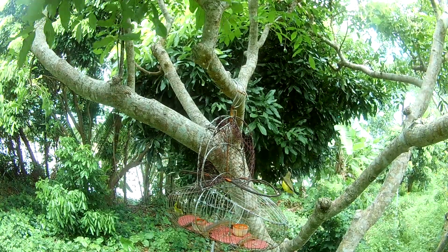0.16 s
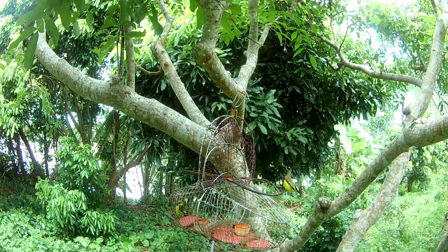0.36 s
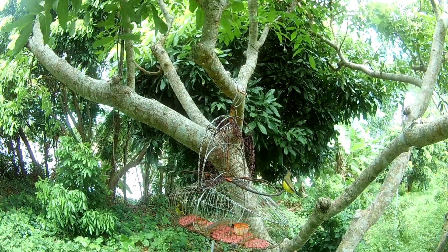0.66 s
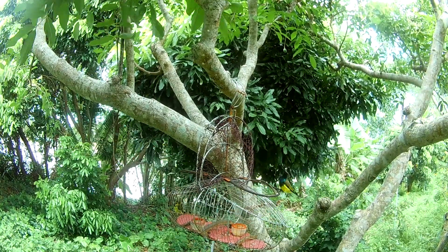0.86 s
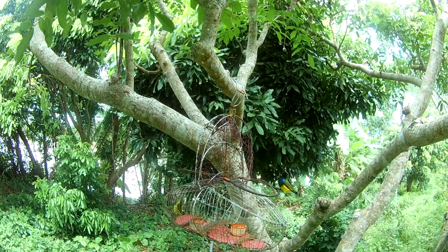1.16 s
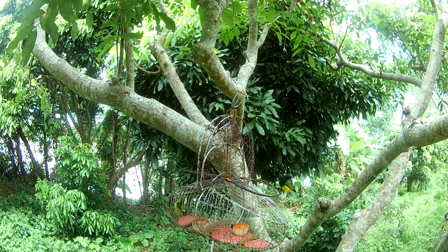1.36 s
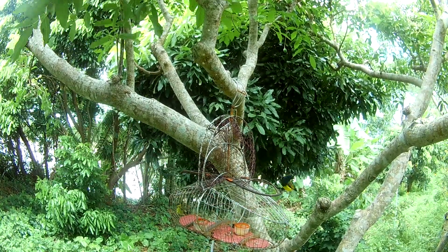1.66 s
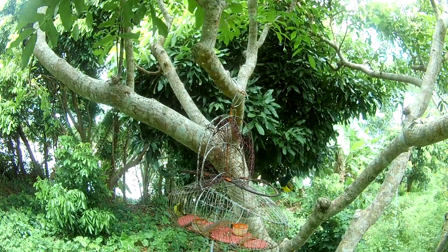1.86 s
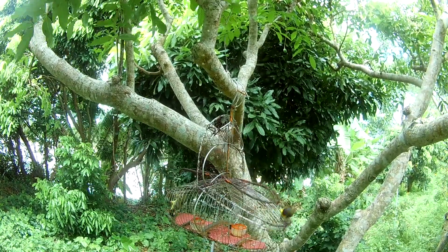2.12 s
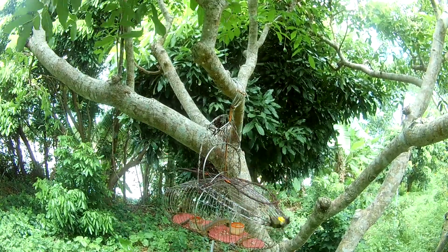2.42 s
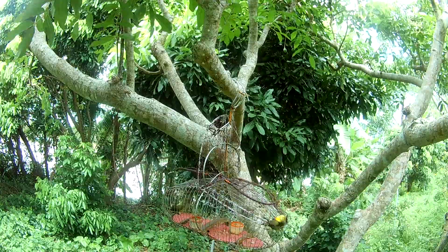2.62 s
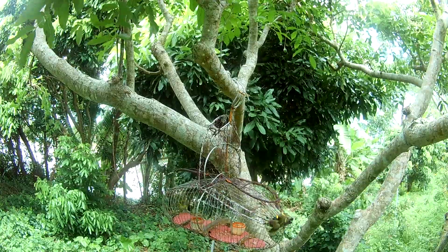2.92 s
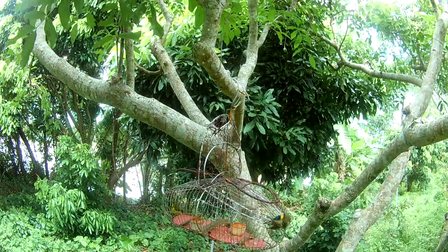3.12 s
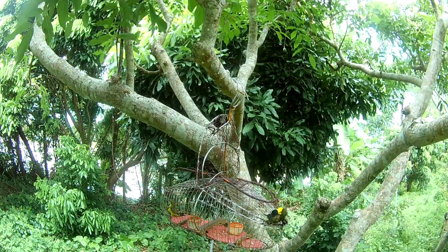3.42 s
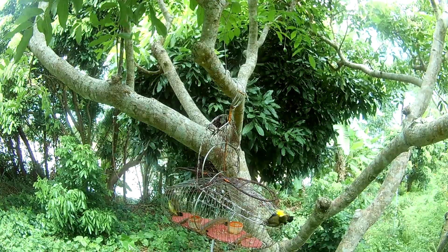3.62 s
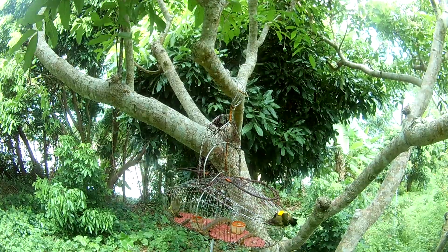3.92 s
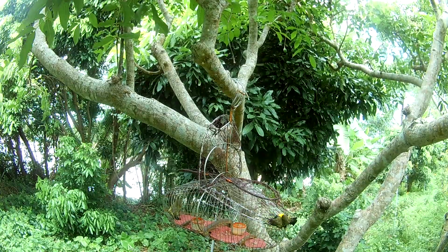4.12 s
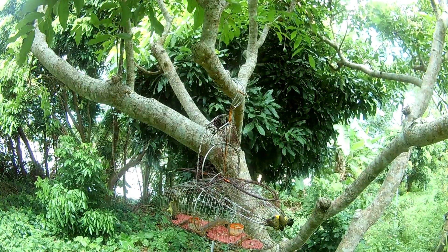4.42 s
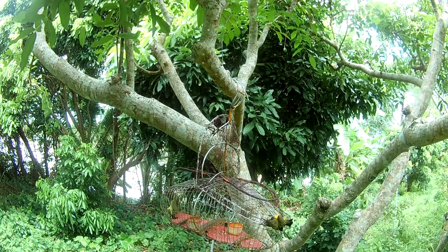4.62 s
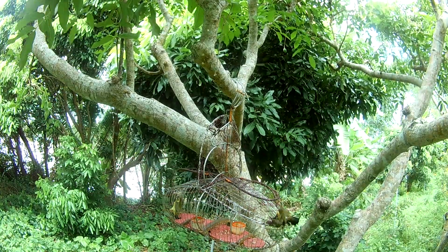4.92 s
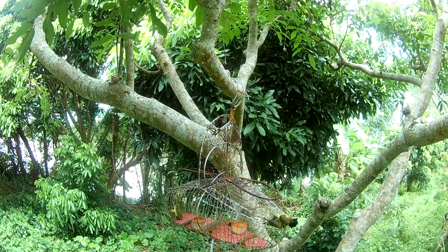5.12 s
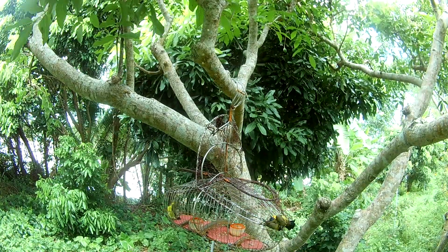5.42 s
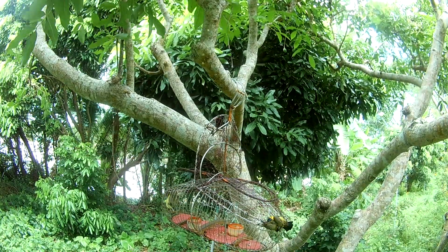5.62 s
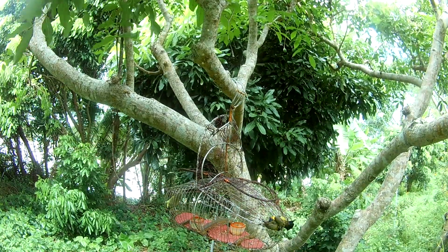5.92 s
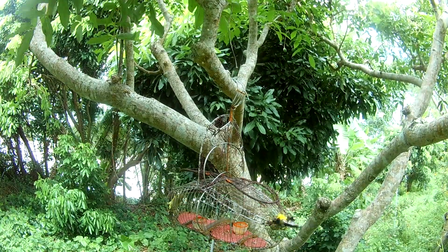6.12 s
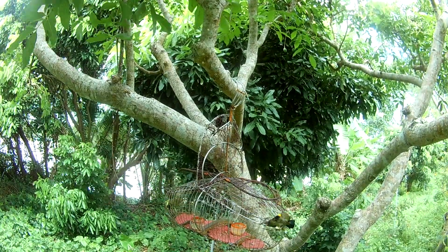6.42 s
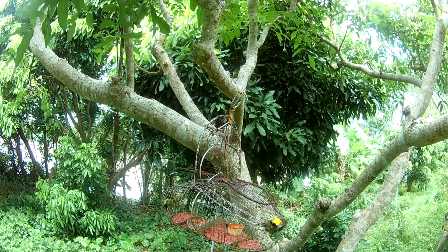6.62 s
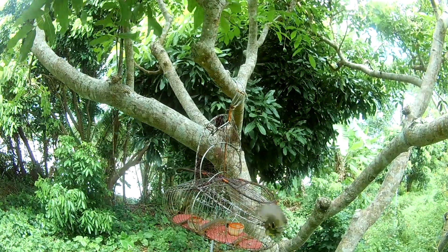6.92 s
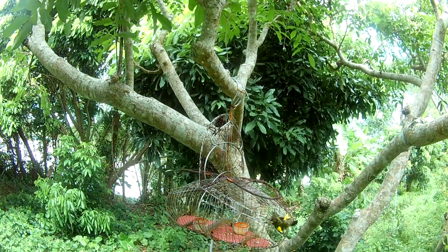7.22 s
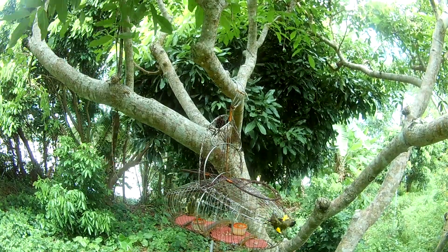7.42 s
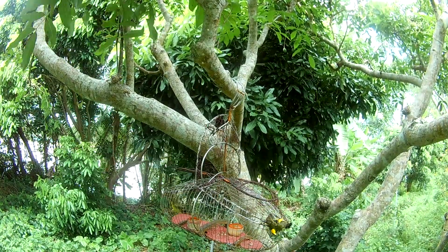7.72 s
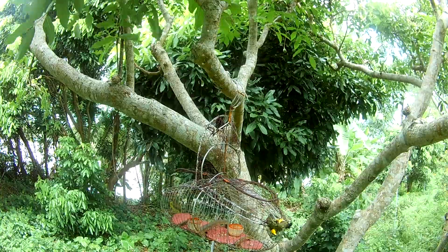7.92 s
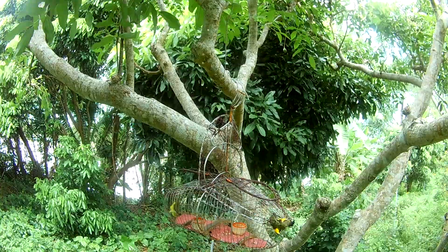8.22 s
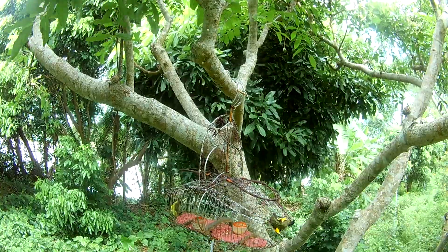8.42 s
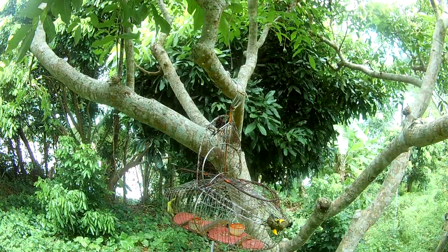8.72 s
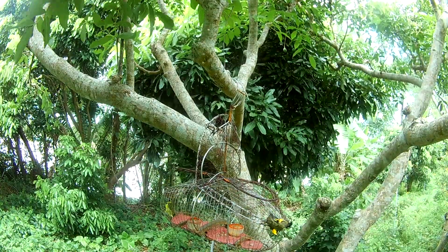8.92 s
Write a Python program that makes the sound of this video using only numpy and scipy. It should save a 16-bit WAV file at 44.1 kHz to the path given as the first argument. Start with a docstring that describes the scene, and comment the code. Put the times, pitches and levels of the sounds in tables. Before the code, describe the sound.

Outdoors among trees, small birds open with faint buzzy slurs, then a run of harsh chatter with a few dry twig ticks and a thin nasal squeal. Three clear rising whistles follow about 0.7 seconds apart, then a buzzy slur and more quick chatter, a tiny high tick, and three more whistles. Distant birds twitter throughout while wind thumps low and irregularly on the microphone.

```python
"""Small birds open with buzzy slurs and a run of harsh two-voiced chatter; dry twig ticks, a pip and a nasal
squeal follow. Sunbirds then give rising whistles, each led in by a tiny two-voiced flick; chatter returns,
a thin V-shaped tick passes, and the whistles come back. Calls are trembling sine voices that bend in pitch,
scattered by trunk echoes and foliage. Throughout, a blurred chorus of chirps twitters far off and shaped
noise makes wind buffeting on the microphone and a soft bed of distant air."""
import sys
import numpy as np
from scipy import signal
from scipy.io import wavfile
from scipy.ndimage import uniform_filter1d, map_coordinates

SR = 44100
rng = np.random.default_rng(int(sys.argv[2]) if len(sys.argv) > 2 else 0)


def transcribe(signal):
    """Save signal, clipped to [-1, 1], as a 16-bit WAV file at the path in sys.argv[1]."""
    frames = np.atleast_2d(signal).T
    limited = np.clip(frames, -1, 1)
    pcm = np.round(limited * 32767).astype(np.int16)
    wavfile.write(sys.argv[1], SR, pcm)


N = 399546
TIME = np.arange(N) / SR  # seconds

# All bird levels are set ahead of the mix; a shape's level_db adds to that of the note.
# rising whistles: start_s, knee_s (where the glide steepens), end_s, level_db
WHISTLES = [(3.637, 3.751, 3.822, -34), (4.252, 4.385, 4.452, -36), (5.003, 5.113, 5.203, -34.5),
            (7.262, 7.367, 7.447, -32.5), (7.982, 8.103, 8.188, -35), (8.662, 8.777, 8.860, -32.5)]
# course of a whistle: stage (0 start, 1 knee, 2 end), pitch_hz, level_db
WHISTLE_SHAPE = [(0, 2974, -35.5), (.15, 3480, -25.5), (.3, 3918, -7.5), (.54, 4288, 0), (.76, 4480, -3.5),
                 (1, 4810, -7), (1.35, 5370, -12.5), (1.7, 5950, -20.5), (2, 6550, -32)]
# overtones of a whistle: multiple, level_db
WHISTLE_PARTIALS = [(1, -2), (2, -54), (3, -53.5)]
# flicks that lead into the whistles: start_s, length_s, level_db
FLICKS = [(3.598, 0.033, -50), (4.212, 0.052, -51.5), (4.968, 0.031, -51.5), (7.228, 0.032, -47),
          (7.944, .034, -46), (8.622, 0.044, -46.5)]
# the two sides of the syrinx in a flick: share_of_note, pitch_hz, level_db
FLICK_LOW = [(0, 4360, 0.5), (.3, 3830, -19.5), (.6, 3730, -9), (.85, 4200, 4), (1, 4450, -4)]
FLICK_HIGH = [(0, 4010, -5.5), (0.248, 5150, -7.5), (.6, 5750, -20), (1, 5330, -21.5)]
# chatter notes: start_s, length_s, level_db, high_side_db (added on the high side)
CHATTER = [(0.56, .054, -55, -5), (0.736, .054, -44.5, -1.5), (1.677, .061, -46, 0),
           (1.883, 0.068, -48, -2), (1.979, 0.058, -45.5, -2), (2.085, 0.061, -47, 0),
           (2.179, .07, -47, -3), (2.284, 0.074, -52.5, 0), (2.392, 0.07, -52.5, 2),
           (2.491, 0.069, -48, -2), (2.606, 0.067, -51, 1.5), (2.762, 0.084, -52, 2.5),
           (2.889, 0.062, -46, -4), (3.068, 0.07, -46, -3.5), (4.865, 0.062, -65, 4),
           (5.525, 0.075, -56.5, 3.5), (5.651, .057, -54, 0), (5.786, .07, -55.5, 4),
           (5.899, .064, -55, 2.5), (6.000, 0.064, -54.5, 3.5), (6.105, 0.069, -47.5, -0.5),
           (6.214, 0.065, -48, -0.5), (6.322, 0.068, -47.5, -0.5), (6.43, 0.068, -46.5, 1),
           (6.541, 0.067, -46.5, -1.5), (6.66, 0.085, -47, -2)]
# the two sides of the syrinx in a chatter note: share_of_note, pitch_hz, level_db
CHATTER_LOW = [(0, 4100, -5.5), (.1, 4400, -5), (.22, 4280, -5.5), (.5, 4400, 4), (.64, 4800, -10.5),
               (.75, 4850, -29), (1, 4730, -28)]
CHATTER_HIGH = [(0, 4880, -13), (0.199, 5150, -6), (0.599, 5070, -8.5), (.73, 5300, -3.5),
                (0.861, 6150, -18), (1, 6240, -18)]
# buzzy slurs: start_s, length_s, first_hz, last_hz, bend (over 1 glides early and levels off),
# level_db, fade_db (lost over the note)
SLURS = [(.02, 0.062, 5460, 6030, 1.3, -62.5, 13), (.18, .11, 4400, 4260, 0.89, -55, 10),
         (.848, .22, 4304, 4660, 2.4, -48, 25), (1.45, .155, 4200, 5520, .6, -54.5, 0.5),
         (5.305, 0.2, 3710, 5200, 5.5, -43.5, 6), (7.582, .225, 4260, 5295, 2.3, -40, 16)]
# clear pips: start_s, length_s, first_hz, last_hz, bend, level_db, fade_db
PIPS = [(2.55, 0.033, 4300, 4090, 1.1, -48, 8), (5.502, 0.027, 3934, 4500, .45, -47.5, 4),
        (5.705, 0.088, 3900, 3900, 1.1, -56, 5), (7.732, 0.036, 4200, 4190, 1.1, -53, -5),
        (7.782, 0.05, 4280, 4200, 1.1, -50, 8), (8.905, 0.041, 4920, 4900, 1.1, -61, 2)]
# course of the nasal squeal: time_s, pitch_hz, level_db, shrillness_db_per_octave
SQUEAL = [(2.89, 2030, -62, -4), (2.91, 2383, -62, 0), (2.934, 2150, -66, 3), (2.956, 2366, -61, -8),
          (3.027, 2524, -68.5, 4.5), (3.061, 2370, -61.5, 1), (3.083, 2120, -65, 2), (3.102, 2420, -65, 0),
          (3.112, 2070, -59, 1)]
# overtones of the squeal: multiple, level_db
SQUEAL_PARTIALS = [(1, -1.5), (1.5, -10.5), (2, 3.5), (2.5, -9), (3, -1.5), (3.5, -22), (4, -22)]
# dry twig ticks as a bird lands: start_s, level_db (of the noise at onset, ahead of its filters)
TWIG_TICKS = [(2.138, -36.5), (2.149, -41), (2.161, -41), (2.186, -53)]
# raspy phrases of birds farther off: start_s, length_s, level_db (strength added to the steady twitter)
FAR_PHRASES = [(0.176, .13, -63), (0.334, 0.21, -63.5), (0.566, 0.44, -63.5), (1.099, 0.356, -66),
               (1.471, 0.28, -66.5), (3.37, 0.19, -66.5), (3.965, 0.35, -73), (4.696, 0.037, -69.5),
               (5.263, 0.27, -66), (6.876, 0.16, -64), (7.49, 0.35, -64.5), (8.40, 0.12, -73.5)]
# breeze on the microphone, before its swings: time_s, large_eddies_db, small_eddies_db
BREEZE = [(0.0, -42.5, -40), (0.11, -42.5, -57.5), (0.5, -42, -55.5), (0.7, -36.5, -51), (0.8, -39, -49),
          (1.0, -38, -38), (1.36, -32, -36.5), (1.58, -44.5, -53), (1.72, -37.0, -42), (2.06, -38.5, -46),
          (2.19, -33, -36.5), (2.5, -34.5, -47), (2.92, -45, -56), (3.06, -33, -44.0), (3.5, -41, -44),
          (4.0, -43.5, -53.0), (4.52, -47.5, -68.5), (4.7, -29, -37), (4.97, -43, -49.5), (5.4, -38.5, -45),
          (5.65, -37.5, -48.5), (5.92, -36, -44), (6.58, -35.5, -46), (6.76, -45, -51.5),
          (6.88, -36, -40.5), (7.1, -31.5, -43), (7.8, -31.5, -39.5), (8.05, -32, -41.5), (8.8, -36, -45.5),
          (8.93, -38, -40.5), (9.06, -32.5, -29.5)]
# moments when the breeze drops between gusts: time_s
LULLS = [0.569, .74, 1.185, 2.089, 2.61, 3.55, 4.44, 5.135, 6.0, 6.34, 6.78, 7.224, 7.355, 7.926, 8.56]
# sudden buffets of wind: start_s, low_thump_db, flutter_db (above the thump in pitch)
BUFFETS = [(.155, -39, -55), (.33, -37, -59), (0.604, -34, -55), (0.684, -32.5, -39), (1.211, -29, -36),
           (1.35, -31.5, -39), (2.136, -39, -44), (2.65, -44, -41), (2.764, -40, -48),
           (3.439, -31.5, -45.5), (3.571, -30, -45), (4.36, -39.5, -46), (4.68, -44, -46),
           (5.055, -32.5, -46), (5.29, -36.5, -36.5), (5.426, -32.5, -38), (5.888, -28.5, -42.5),
           (5.953, -47, -36), (6.21, -26.5, -37.5), (6.421, -28, -36.5), (6.559, -31, -38.5),
           (7.05, -30, -33.5), (7.12, -31.5, -42.5), (7.25, -38.5, -40.5), (7.30, -32, -51),
           (7.48, -30, -36.5), (7.703, -45, -29.5), (7.814, -29, -29), (7.959, -30, -49),
           (8.243, -24.5, -33), (8.38, -31.5, -42), (8.664, -32, -33), (8.91, -27.5, -27)]
# relative noise spectra: frequency_hz, density_db_per_hz
LARGE_EDDIES = [(22, -11.5), (45, 0), (95, 2), (150, -4), (200, -16), (300, -30)]
SMALL_EDDIES = [(110, -18.5), (160, -2.5), (210, 4.5), (300, -9), (450, -13), (700, -32), (1100, -48),
                (2000, -82.5)]
AIR = [(22, 3), (60, 3.5), (250, -4), (500, -1), (1000, -3), (1500, -14.5), (2100, -21), (3000, -22.5),
       (6000, -34), (8000, -33.5), (12000, -36), (15500, -32.5)]
# strong reflections from the nearest trunks and the ground: delay_s, level_db
TRUNKS = [(.0043, -9), (0.0096, -6.5), (.021, -23), (.038, -20)]

TICK_START_S, TICK_S, TICK_BOTTOM_HZ, TICK_SWOOP_HZ = 7.054, 0.031, 6430, 1450
TICK_DB, TICK_EDGE_DB = -53.5, -12  # level at the bottom of the swoop; change towards either end
FAR_ATTACK_S, FAR_RELEASE_S, FAR_STEADY_DB = 0.02, 0.039, -69
LULL_S, LULL_DB = 0.02, -14
BUFFET_ATTACK_S, BUFFET_HOLD_S, BUFFET_RELEASE_S = 0.0055, 0.024, 0.048
EDDY_TOP_HZ, AIR_DB, CUTOFF_HZ = 1010, -58, 15750


def rising_whistles():
    """Each whistle climbs to its loudest, eases, then steepens upward as it fades."""
    out = np.zeros(N)
    for start, knee, end, level_db in WHISTLES:
        stage = np.interp(span(start, end), [start, knee, end], [0, 1, 2])
        hz, shape_db = read(WHISTLE_SHAPE, stage)
        add(out, start, syrinx(hz, shape_db + level_db, jitter=0.0063, partials=WHISTLE_PARTIALS))
    return out


def flicks():
    """Both sides of the syrinx sound at once: the low one dips and recovers as the high one leaps."""
    low = repeats(FLICKS, FLICK_LOW, variety=0.018, jitter=0.018)
    high = repeats(FLICKS, FLICK_HIGH, variety=0.03, jitter=0.038)
    return low + high


def chatter():
    """The low side pulses in quick upward strokes while the high side rasps above it."""
    low_notes = [(start, length, level_db) for start, length, level_db, _ in CHATTER]
    high_notes = [(start, length, level_db + high_db) for start, length, level_db, high_db in CHATTER]
    low = repeats(low_notes, CHATTER_LOW, variety=0.02, jitter=0.017,
                  warble=0.075, warble_hz=145, throb_db=6)
    high = repeats(high_notes, CHATTER_HIGH, variety=0.025, jitter=0.034,
                   warble=0.045, warble_hz=145, throb_db=4)
    voice = from_db(-1.5) * (low + high)
    return voice * (1 + 0.096 * drift(3500, N))  # unsteady airflow spreads a faint rasp around the notes


def slurs():
    """A fast warble of pitch puts the buzz into each bending note."""
    return glides(SLURS, attack_s=0.021, release_s=0.016, jitter=0.021, warble=0.021, warble_hz=168)


def pips():
    """Short clear notes: the same bending voice with no warble."""
    return glides(PIPS, attack_s=0.006, release_s=0.005, jitter=0.015)


def squeal():
    """A thin, wavering nasal cry whose overtones flare as the bird strains."""
    start = SQUEAL[0][0]
    hz, db, shrill_db = read(SQUEAL, span(start, SQUEAL[-1][0]))
    out = np.zeros(N)
    add(out, start, syrinx(hz, db, jitter=0.0048, partials=SQUEAL_PARTIALS, shrill_db=shrill_db))
    return out


def tick():
    """A thin, very high call swoops down and back up, loudest at the bottom."""
    out = np.zeros(N)
    height = np.linspace(-1, 1, len(span(0, TICK_S))) ** 2
    hz = TICK_BOTTOM_HZ + TICK_SWOOP_HZ * height
    add(out, TICK_START_S, syrinx(hz, TICK_DB + TICK_EDGE_DB * height, jitter=0.0097))
    return out


def twig():
    """Fast-decaying noise makes a dry crack: a woody middle band and a faint bright one."""
    out, t = np.zeros(N), span(0, 0.04)
    for start, level_db in TWIG_TICKS:
        crack = rng.standard_normal(len(t)) * from_db(level_db - 60 * t / 0.031)
        wood = band(crack, 1200, 2340)
        snap = from_db(-26) * band(crack, 2500, 11000)
        add(out, start, wood + snap)
    return out


def chorus(count, centre_hz, spread, dull_db):
    """Distant raspy chirps overlap and blur among the trees; the higher ones are fainter."""
    out, share = np.zeros(N), np.linspace(0, 1, int(0.04 * SR))
    for k, (when, pitch, slope) in enumerate(rng.random((count, 3))):
        hz = centre_hz * np.exp(spread * pitch + 0.2 * (slope - 0.5) * (share - 0.5))
        chirp = np.sin(np.pi * share) * syrinx(hz, dull_db * pitch, jitter=0.035)
        add(out, (k + when) / count * N / SR, chirp)
    blur = foliage(out, t60=0.36, onset_s=0.0046, low_hz=3530, high_hz=6700)
    loudness = np.sqrt(uniform_filter1d(blur ** 2, SR // 10) + 1e-9)
    return far_phrases() * blur / loudness  # levelled first, so the phrases set the strength


def far_phrases():
    """Strength of the distant birds: phrases stand out of a faint steady twitter."""
    strength = np.full(N, from_db(FAR_STEADY_DB))
    for start, length, level_db in FAR_PHRASES:
        add(strength, start, from_db(level_db) * swell(length, FAR_ATTACK_S, FAR_RELEASE_S))
    return strength


def wind(unsteady_db, unsteady_per_s):
    """An unsteady breeze with brief lulls rumbles on the microphone; buffets come on top."""
    lulls = sum(np.exp(-((TIME - when) / LULL_S) ** 2) for when in LULLS)
    swing_db = LULL_DB * lulls + unsteady_db * drift(unsteady_per_s, N)
    breeze = from_db(np.array(read(BREEZE, TIME)) + swing_db)
    large, small = np.hypot(breeze, buffets())  # powers add
    rumble = eddies(LARGE_EDDIES, large, lumps_db=6.5, lumps_per_s=30)
    flutter = eddies(SMALL_EDDIES, small, lumps_db=6.5, lumps_per_s=50)
    return rumble + flutter


def buffets():
    """Strength of the large and small eddies that hit the microphone abruptly and soon die away."""
    large, small = np.zeros((2, N))
    shape = swell(BUFFET_ATTACK_S + BUFFET_HOLD_S, BUFFET_ATTACK_S, BUFFET_RELEASE_S)
    for start, thump_db, flutter_db in BUFFETS:
        add(large, start, from_db(thump_db) * shape)
        add(small, start, from_db(flutter_db) * shape)
    return large, small


def eddies(spectrum, strength, lumps_db, lumps_per_s):
    """Turbulence is noise in short lumps, evened out over longer spans so the wind sets its strength."""
    flow = noise(spectrum) * from_db(lumps_db * drift(lumps_per_s, N))
    power = uniform_filter1d(uniform_filter1d(flow ** 2, size=1700), size=900)
    return band(strength * flow / np.sqrt(power + 1e-9), 20, min(spectrum[-1][0], EDDY_TOP_HZ))


def air():
    """Steady noise, heaviest in the lows, makes the soft distant hum of air."""
    return from_db(AIR_DB) * noise(AIR)


def trunks(x):
    """A few distinct echoes beat against a gliding note and make it flutter."""
    out = x.copy()
    for delay, level_db in TRUNKS:
        add(out, delay, from_db(level_db) * x)
    return out


def foliage(x, t60, onset_s, low_hz, high_hz):
    """Many small echoes from leaves and trunks build up and die away; the tail has unit energy."""
    t = span(0, t60)
    echoes = rng.standard_normal(len(t)) * (rng.random(len(t)) < 3000 / SR)  # about 3000 a second
    decay = from_db(-60 * t / t60) * (1 - np.exp(-t / onset_s))
    tail = band(echoes * decay, low_hz, high_hz)
    return signal.fftconvolve(x, tail / np.linalg.norm(tail))[:N]


def syrinx(hz, db, jitter, warble=0, warble_hz=0, throb_db=0, partials=((1, 0),), shrill_db=0):
    """One vibrating membrane: its pitch trembles at random; a fast warble swings pitch and strength."""
    n = len(hz)
    cycle = 2 * np.pi * (np.cumsum(warble_hz * (1 + 0.1464 * drift(80, n))) / SR + rng.random())
    wavering_hz = hz * (1 + jitter * drift(900, n) + warble * np.sin(cycle))
    phase = 2 * np.pi * np.cumsum(wavering_hz) / SR
    edge = np.clip(np.minimum(np.arange(n), np.arange(n)[::-1]) / (0.0025 * SR), 0, 1)
    tone = 0
    for multiple, level_db in partials:
        tilt_db = np.log2(multiple) * (shrill_db + 1.4 * drift(51.7, n))
        tone = tone + from_db(level_db + tilt_db) * np.sin(round(2 * multiple) / 2 * phase)
    strength = from_db(db + throb_db * np.cos(cycle) + 2.02 * drift(105, n))  # loudest on each upswing
    return np.sqrt(2) * strength * np.sin(edge * np.pi / 2) ** 2 * tone


def repeats(notes, shape, variety, **voice):
    """One side of the syrinx repeats its course, a little different in every note."""
    out = np.zeros(N)
    for start, length, level_db in notes:
        share = (span(start, start + length) - start) / length
        hz, shape_db = read(shape, share)
        varied_hz = hz * (1 + variety * drift(37.9, len(hz)))
        add(out, start, syrinx(varied_hz, shape_db + level_db, **voice))
    return out


def glides(notes, attack_s, release_s, **voice):
    """Single notes bend from one pitch to another while their level slides by fade_db."""
    out = np.zeros(N)
    for start, length, first_hz, last_hz, bend, level_db, fade_db in notes:
        t = span(0, length)
        share = np.clip(t / length, 0, 1)
        hz = last_hz + (first_hz - last_hz) * (1 - share) ** bend
        edges = np.clip(np.minimum(t / attack_s, (length - t) / release_s), 0, 1)
        add(out, start, edges * syrinx(hz, level_db - fade_db * share, **voice))
    return out


def swell(length, attack_s, release_s):
    """Rise, hold until the length is up, then die away."""
    t = span(0, length + release_s)
    return np.clip(t / attack_s, 0, 1) * np.clip((length + release_s - t) / release_s, 0, 1) ** 2


def noise(spectrum):
    """Half-octave bands of noise following a spectrum; rms 1."""
    hz, db = np.transpose(spectrum)
    edges = 20 * 2 ** (np.arange(21) / 2)
    white, out = rng.standard_normal((2, N)), 0  # neighbouring bands use different noise
    for k, (low, high) in enumerate(zip(edges, edges[1:])):
        if high > hz[0] and low < hz[-1]:
            band_db = np.interp(np.log(low * high) / 2, np.log(hz), db)
            out = out + from_db(band_db) * band(white[k % 2], low, high)
    return rms_one(out)


def drift(rate, size):
    """Smooth chance with spread about 1, renewed rate times a second."""
    at = np.arange(size) * rate / SR
    return map_coordinates(rng.standard_normal(int(at[-1]) + 2), [at], order=2, mode="nearest")


def band(x, low_hz, high_hz):
    """Gentle band-pass."""
    edges_hz = [low_hz, min(high_hz, 0.45 * SR)]
    return signal.sosfilt(signal.butter(2, edges_hz, "band", fs=SR, output="sos"), x)


def from_db(db):
    """Decibels to gain."""
    return 10 ** (np.asarray(db) / 20)


def rms_one(x):
    """Scale to unit power."""
    return x / np.sqrt(np.mean(x ** 2) + 1e-20)


def read(rows, at):
    """Each column of a table, joined by straight lines along the first."""
    key, *columns = np.transpose(rows)
    return [np.interp(at, key, column) for column in columns]


def span(start, end):
    """Sample times of a note, at least 64 of them."""
    return start + np.arange(max(int((end - start) * SR), 64)) / SR


def add(out, start, sound):
    """Mix a sound in at its time."""
    i = max(int(start * SR), 0)
    out[i:i + len(sound)] += sound[:max(N - i, 0)]


def scene():
    """Near and farther birds in the trees, wind at the microphone."""
    near = trunks(rising_whistles())
    farther = trunks(chatter() + slurs() + flicks())
    close = squeal() + pips() + tick() + twig()  # these skip the trunk echoes
    birds = near + from_db(-18) * foliage(near, t60=0.55, onset_s=0.002, low_hz=3500, high_hz=7240)
    birds += from_db(-1.0) * farther
    birds += from_db(-13) * foliage(farther, t60=0.27, onset_s=0.0066, low_hz=3080, high_hz=6840)
    birds += close + from_db(-12) * foliage(close, t60=0.14, onset_s=0.005, low_hz=2000, high_hz=8000)
    birds += chorus(count=1400, centre_hz=4083, spread=0.35, dull_db=-16.5)
    return (birds + wind(unsteady_db=2.5, unsteady_per_s=18) + air())[None]


def record(dry):
    """A steep elliptic low-pass cuts the very top."""
    return signal.sosfilt(signal.ellip(12, 0.1, 80, CUTOFF_HZ, fs=SR, output="sos"), dry)


dry = scene()
out = record(dry)
transcribe(out)
```